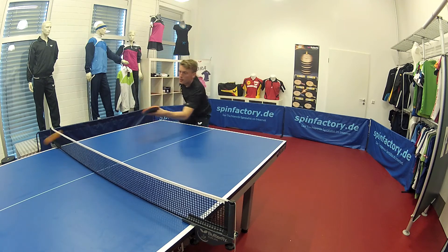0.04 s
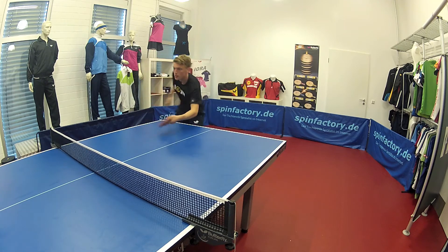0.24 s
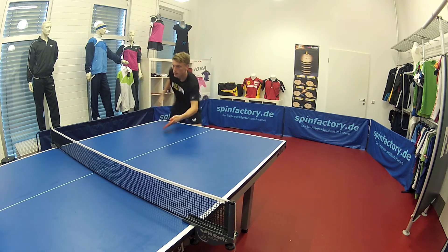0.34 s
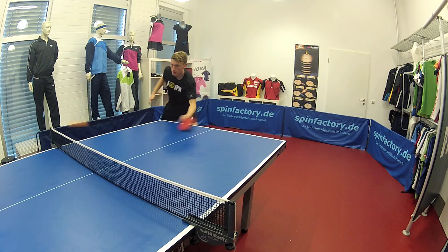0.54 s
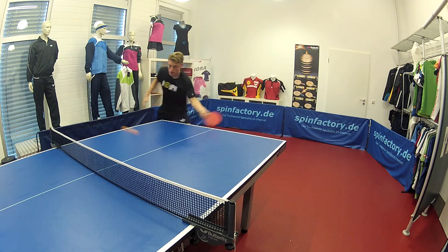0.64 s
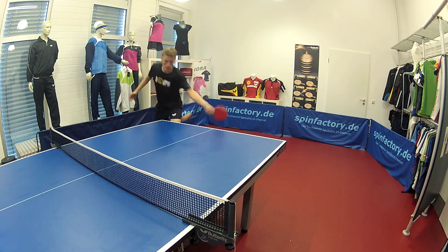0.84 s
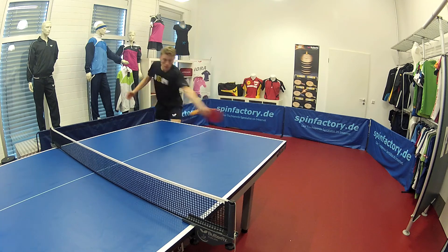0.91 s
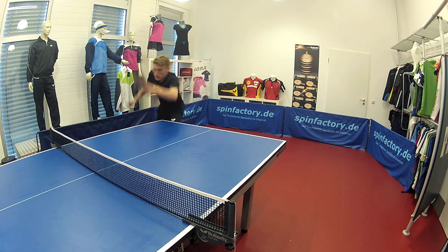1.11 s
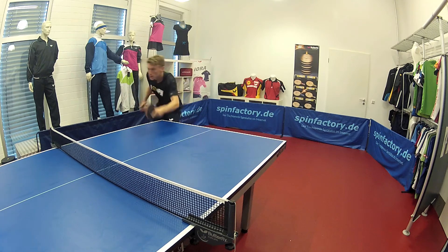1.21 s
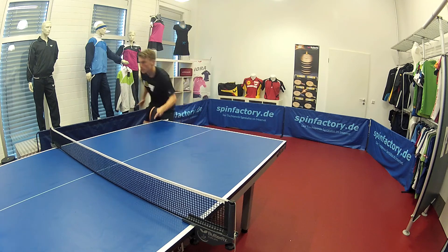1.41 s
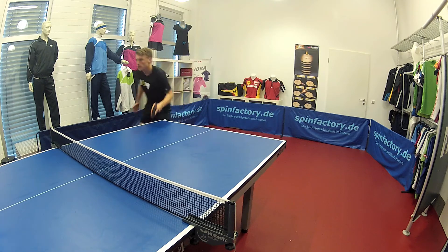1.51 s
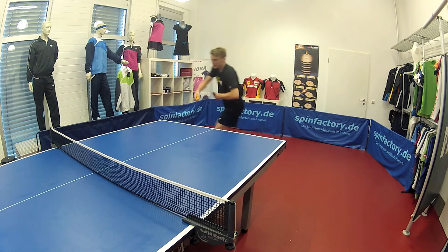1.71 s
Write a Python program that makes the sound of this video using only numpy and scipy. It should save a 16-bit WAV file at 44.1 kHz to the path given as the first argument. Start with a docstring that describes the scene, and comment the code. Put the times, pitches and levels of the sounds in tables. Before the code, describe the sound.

A table tennis ball tocks on the table at about 0.2 seconds. A rubber sole squeaks briefly around 0.5, and the ball bounces again at 0.8. A loud racket smash cracks just before 1.0, echoing through the small room, followed by a table bounce at 1.1 and a hard clack at 1.2. Faint taps come near 1.5, with soft footfalls and low room hiss underneath.

```python
"""A table tennis ball in a rally, heard from beside the net in a small, bright sports room.
It tocks on the ringing table top, cracks off a racket in a smash and clacks against something hard.
A rubber sole sticks and slips in a squeak; shoes scuff and thud faintly over the hiss of the room.
The two microphones are largely in opposite phase. Near the end the sound fades out
and the empty room fades back in."""
import sys
import numpy as np
from scipy import signal
from scipy.fft import rfft, irfft
from scipy.io import wavfile
from scipy.ndimage import uniform_filter1d

SR = 44100
rng = np.random.default_rng(int(sys.argv[2]) if len(sys.argv) > 2 else 0)


def dump(signal):
    """Clip the signal to [-1, 1] and save it as 16-bit WAV at the path in sys.argv[1]."""
    limited = np.clip(np.atleast_2d(signal).T, -1, 1)
    pcm = np.round(limited * 32767).astype(np.int16)
    wavfile.write(sys.argv[1], SR, pcm)


N = 77175

# Hits on the table: (time [s], level [dB], tilt [dB/octave], deep ring [dB], ball shell [dB],
# room send [dB], contact tick [dB])
BOUNCES = [(0.2367, 5.5, 0.5, -5, -10.5, 0.5, -30), (0.7713, 8.5, 0.5, 10, -13, -3, -36),
           (1.1164, 10, 1, -2, -29, -1.5, -43)]
# Ringing notes of the table top: (frequency [Hz], relative level [dB], t60 [s])
TABLE_MODES = [(250.6, -21.5, 0.54), (323, -26.5, 0.63), (490.6, -18.5, 0.47), (583, -20.5, 0.19),
               (735, -4, 0.086), (1125, -3, 0.13), (1277, -1.5, 0.032), (1485, -5, 0.055),
               (1640, -10.5, 0.08), (1917, -18.5, 0.037)]
# Woody body of its many weaker modes: (frequency [Hz], gain [dB])
PANEL_EQ = [(60, -45), (170, -21), (270, 4), (600, 4), (1000, 7), (1800, -0.5), (2250, -5), (2700, -18.5),
            (3400, -10.5), (4200, -25.5), (5200, -20), (7000, -23.5), (15000, -49)]
# Ping of the hollow ball: (frequency [Hz], relative level [dB], t60 [s])
SHELL_MODES = [(3400, -7, 0.0034), (4880, -2, 0.0078), (6860, -20, 0.0046), (8650, -3.5, 0.0081),
               (8520, -2, 0.0096), (9910, 3.5, 0.0086), (11660, -3.5, 0.0048), (11900, 1, .004),
               (13270, 1, .003)]
CONTACT_DB, TABLE_RING_DB, SHELL_DRY_DB = -6.5, -3, -30
DEEP_BELOW_HZ, MODES_ABOVE_HZ = 400, 170
TICK_HZ, TICK_WIDTH_S = 3360, 0.000506


def bounce(db, tilt_db, deep_db, shell_db, room_db, tick_db):
    """The struck table top gives a woody tock; the ball's shell pings into the room."""
    contact = ring(t60=0.17, rise=0.00084) + amp(CONTACT_DB) * click()
    tock = colour(contact, PANEL_EQ, tilt_db)
    strength = np.sqrt(np.sum(tock[0] ** 2))
    struck = [(hz, level + deep_db * (hz < DEEP_BELOW_HZ), t60) for hz, level, t60 in TABLE_MODES]
    ringing = signal.lfilter(*signal.butter(2, MODES_ABOVE_HZ, "high", fs=SR), modes(struck))
    top = tock + amp(TABLE_RING_DB) * strength * ringing
    shell = amp(shell_db) * strength * modes(SHELL_MODES)
    out = top + amp(SHELL_DRY_DB) * shell + room(amp(room_db) * top + shell)
    out[0] += wavelet(2 * TICK_WIDTH_S, tick_db, TICK_HZ, TICK_WIDTH_S)
    return amp(db) * out


# Tone of the racket's crack: (frequency [Hz], gain [dB])
SMASH_EQ = [(40, -57), (170, -22.5), (330, -14), (650, -3.5), (1030, 5), (1450, 0.5), (1950, 2), (2500, 0),
            (3150, 3), (4300, -0.5), (5400, 0.5), (6400, -4), (7100, -1.5), (7800, -10), (8400, -0.5),
            (8900, 3), (9600, -12), (12000, -15.5), (13600, -13), (15500, -52)]
# Ping of racket and ball: (frequency [Hz], relative level [dB], t60 [s])
PING_MODES = [(2848, -5.5, 0.013), (3130, 2, 0.014), (3327, -4.5, 0.022)]
SMASH_AT_S, WALL_DELAY_S = 0.9637, 0.009
SMASH_DB, PING_DB, SNAP_DB, EARLY_DB, WALL_DB = 14.5, -13, -22, -12, -13


def smash():
    """The racket's crack is weak on the direct path, returns hard from the walls and fills the room."""
    crack = colour(click(), SMASH_EQ) + amp(PING_DB) * modes(PING_MODES)
    snap = amp(SNAP_DB) * colour(ring(t60=0.035), SMASH_EQ, tilt_db=5)
    out = amp(EARLY_DB) * colour(ring(t60=0.29), SMASH_EQ)
    walls = amp(WALL_DB) * colour(ring(t60=0.16), SMASH_EQ, tilt_db=-1.5)
    add(out, WALL_DELAY_S, snap + walls + room(crack))
    return amp(SMASH_DB) * out


# Slapback of the smash: (time [s], level [dB], pitch [Hz], width [s])
SLAPS = [(0.97365, -11, 1830, 0.00035), (0.9847, -17, 2840, 0.0004)]


def slapback():
    """The first hard reflections of the smash arrive as tiny, sharp pulses."""
    return sum(wavelet(*row) for row in SLAPS)


# Ball against hard things: (time [s], level [dB], tilt [dB/octave], room send [dB])
CLACKS = [(0.2032, -16.5, -3.5, -15.5), (1.2115, -14, 0, 9.5), (1.2141, -0.5, -0.5, 2),
          (1.2186, -21.5, 11.5, -22)]
# Brittle tone of a clack: (frequency [Hz], gain [dB])
CLACK_EQ = [(40, -37), (150, -33), (400, -7.5), (1200, -3), (2600, -6), (4000, 5.5), (5200, 2), (6500, -10),
            (7800, -8.5), (9000, -9), (10300, -6), (13000, -20.5), (15500, -38)]
CLACK_RING_DB, ECHO_DB_PER_OCTAVE = 2, -2


def clack(db, tilt_db, room_db):
    """A short, hard contact of the ball; its echo is duller than the direct snap."""
    contact = click() + amp(CLACK_RING_DB) * ring(t60=0.018)
    echo = room(colour(contact, CLACK_EQ, tilt_db + ECHO_DB_PER_OCTAVE))
    return amp(db) * (colour(contact, CLACK_EQ, tilt_db) + amp(room_db) * echo)


# Faint, dull taps: (time [s], level [dB])
TAPS = [(0.2025, -17.5), (1.4745, -8.5), (1.489, -13), (1.5105, -8.5)]


def tap(db):
    """A light touch on wood that hardly rings."""
    touch = amp(db) * colour(ring(t60=0.045, rise=0.0011), PANEL_EQ, tilt_db=0.5)
    return touch + room(touch)


# Pitch and level curve of the squeak: (time [s], pitch [Hz], relative level [dB])
SQUEAK_CURVE = [(0.41, 2922, -61), (0.422, 2838, -32), (0.431, 2587, -25.5), (0.441, 2569, -15.5),
                (0.446, 2615, -35), (0.451, 2608, -12.5), (0.459, 2625, -18), (0.473, 2622, -34),
                (0.479, 2590, -22), (0.497, 2595, -31.5), (0.531, 2611, -21.5), (0.544, 2628, -35),
                (0.548, 2628, -24), (0.572, 2606, -33), (0.59, 2584, -22.5), (0.609, 2572, -33),
                (0.624, 2560, -58)]
# Its edge, the overtones that swell as the fundamental eases: (time [s], level [dB])
SQUEAK_EDGE = [(.415, -51), (.434, -36.5), (.468, -46), (.485, -36.5), (.53, -45.5), (.563, -37.5),
               (.59, -43.5), (.62, -54)]
# Mix of harmonics 2, 3 and 4: (level relative to the edge [dB])
SQUEAK_OVERTONES = [0, -17, -24]
SQUEAK_DB, SQUEAK_ROOM_DB, SQUEAK_LEFT_DB = 1, -7.5, -19.5
JITTER_DEPTH, JITTER_S = 0.0081, 0.002


def squeak():
    """A rubber sole sticks and slips on the floor at a nearly steady pitch."""
    t = np.arange(N) / SR
    times, hz, db = np.transpose(SQUEAK_CURVE)
    jitter = unit(uniform_filter1d(rng.standard_normal(N), int(JITTER_S * SR)))
    pitch = np.interp(t, times, hz) * (1 + JITTER_DEPTH * jitter)
    phase = 2 * np.pi * np.cumsum(pitch) / SR
    tone = amp(SQUEAK_DB + np.interp(t, times, db)) * np.sin(phase)
    edge_db = np.interp(t, *np.transpose(SQUEAK_EDGE))
    for harmonic, level in enumerate(SQUEAK_OVERTONES, start=2):
        tone += amp(edge_db + level) * np.sin(harmonic * phase)
    return (tone * (t > times[0]) * (t < times[-1]))[None]


# Shoe slides: (peak time [s], level [dB], attack [s], decay [s], tilt [dB/octave])
SCUFFS = [(0.046, -49.5, 0.0036, 0.006, -10.5), (0.449, -36.5, 0.039, 0.0071, 2.5),
          (0.58, -42.5, 0.0053, 0.0051, -2.5), (0.893, -36.5, 0.0013, 0.03, -1)]
# Tone of the friction: (frequency [Hz], gain [dB])
SCUFF_EQ = [(40, -46.5), (200, -18.5), (550, -1), (1200, 4), (2500, 3.5), (4000, -4), (7500, -6),
            (10000, -17), (15000, -36)]
GRAIN_SPREAD_DB, SCUFF_DRY_DB = 7.5, 3.5


def scuff(peak_s, db, rise, fall, tilt_db):
    """Grainy friction of a sliding sole swells, dies and echoes in the room."""
    t = np.arange(N) / SR - peak_s
    grains = rng.standard_normal((2, N)) * amp(-GRAIN_SPREAD_DB * rng.standard_normal(N))
    envelope = np.exp(-np.maximum(-t / rise, t / fall))
    slide = amp(db) * unit(colour(grains, SCUFF_EQ, tilt_db)) * envelope
    return amp(SCUFF_DRY_DB) * slide + room(slide)


# Soft footfalls: (time [s], level [dB], pitch [Hz], width [s])
STEPS = [(0.586, -54, 110, 0.012), (0.775, -46, 110, 0.005), (1.038, -48, 118, 0.015),
         (1.402, -50, 129, 0.024), (1.5, -47, 128, 0.029)]
STEPS_LEFT_DB = -5.5


def footsteps():
    """Feet push the sprung floor into brief, low thuds."""
    return sum(wavelet(*row) for row in STEPS)


# Reverb time of the room: (frequency [Hz], t60 [s])
ROOM_DECAY = [(100, 0.2), (300, 0.99), (1000, 1), (2000, 1), (4000, 1), (8000, 0.9), (14000, 0.15)]
ROOM_RISE_S = 0.006


def room(x):
    """Diffuse echo that builds up quickly and dies fastest in the deep bass and high treble."""
    hz, t, noise = signal.stft(rng.standard_normal((2, N)), SR, nperseg=256)
    rate = np.log(1000) / read(ROOM_DECAY, hz)[:, None]
    decaying = noise * np.exp(-rate * t) * np.sqrt(2 * rate / SR)  # equal energy in each band
    tail = signal.istft(decaying, SR, nperseg=256)[1][:, :N]
    tail *= 1 - np.exp(-np.arange(N) / SR / ROOM_RISE_S)
    return signal.fftconvolve(x[:1], tail, axes=1)[:, :N]


# Room tone: (frequency [Hz], relative level [dB])
AIR_EQ = [(25, 9), (60, 3), (100, 8), (170, 6.5), (500, 9), (1100, 8), (1800, 3), (2600, 2), (6000, -1.5),
          (10000, -5), (15000, -8)]
AIR_DB, TAIL_DB, TAIL_FALL_DB_PER_S = -55, -56.5, 82


def air():
    """Steady hiss of the room, with the dying echo of an earlier stroke."""
    hiss = amp(AIR_DB) * unit(colour(rng.standard_normal((2, N)), AIR_EQ))
    tail = unit(colour(rng.standard_normal((2, N)), SMASH_EQ, tilt_db=-4))
    return hiss + tail * amp(TAIL_DB - TAIL_FALL_DB_PER_S * np.arange(N) / SR)


# Stereo image of the rally: (frequency [Hz], left-right correlation [-1 to 1])
RALLY_IMAGE = [(50, 1), (95, -0.8), (150, -0.54), (400, -0.1), (1000, -0.58), (2700, -0.44), (6000, -0.49),
               (8500, -0.72), (10500, -0.82), (15000, -0.8)]
# Stereo image of the room tone: (frequency [Hz], left-right correlation [-1 to 1])
AIR_IMAGE = [(40, 1), (130, 0.62), (300, 0.32), (700, -0.19), (1400, -0.66), (3000, -0.053), (7000, -0.094),
             (15000, 0.5)]
# Lean to the right: (frequency [Hz], left minus right [dB])
BALANCE = [(60, -6), (140, -1), (220, -6), (330, -12), (500, -9.5), (800, -5), (1700, -1), (2700, -5),
           (6000, -2), (9500, -.5), (15000, 0.5)]


def microphones(x, image):
    """The left microphone shares part of the right one's sound, mostly inverted, plus a diffuse part."""
    hz = np.fft.rfftfreq(2 * N, 1 / SR)
    right, diffuse = rfft(x, 2 * N)
    shared = np.clip(read(image, hz), -1, 1)
    left = amp(read(BALANCE, hz)) * (shared * right + np.sqrt(1 - shared ** 2) * diffuse)
    return irfft(np.array([left, right]))[:, :N]


def click():
    """A direct impulse. Row 0 reaches both microphones; row 1 is for diffuse sound on the left alone."""
    x = np.zeros((2, N))
    x[0, 0] = 1
    return x


def ring(t60, rise=1e-5):
    """A dense crowd of modes falling together by 60 dB in t60 seconds, energy 1."""
    t = np.arange(N) / SR
    decaying = rng.standard_normal((2, N)) * 1e-3 ** (t / t60)
    return unit(decaying * (1 - np.exp(-t / rise))) / np.sqrt(N)


def modes(table):
    """Single modes as decaying sines of random phase, energy 1."""
    t = np.arange(N) / SR
    x = sum(amp(db) * 1e-3 ** (t / t60) * np.sin(2 * np.pi * (hz * t + rng.random((2, 1))))
            for hz, db, t60 in table)
    return unit(x) / np.sqrt(N)


def wavelet(centre_s, db, hz, width_s):
    """A few cycles under a bell-shaped envelope."""
    t = np.arange(N) / SR - centre_s
    return amp(db) * np.exp(-(t / width_s) ** 2 / 2) * np.sin(2 * np.pi * hz * t)


def colour(x, eq, tilt_db=0):
    """Minimum-phase EQ, tilted in dB per octave about 2 kHz."""
    hz = abs(np.fft.fftfreq(4096, 1 / SR))
    octaves = np.log2(np.maximum(hz, 200) / 2000)
    log_gain = np.log(amp(read(eq, hz) + tilt_db * octaves))
    impulse = np.fft.ifft(np.exp(np.conj(signal.hilbert(log_gain)))).real[:2048]
    return signal.fftconvolve(x, impulse[None], axes=1)[:, :N]


def amp(db):
    """Decibels to gain."""
    return 10 ** (np.asarray(db) / 20)


def unit(x):
    """Scales to rms 1."""
    return x / np.sqrt(np.mean(x ** 2) + 1e-20)


def read(points, hz):
    """Reads a table on a log-frequency axis."""
    f, value = np.transpose(points)
    return np.interp(np.log(hz + 1), np.log(f), value)


def add(mix, s, sound):
    """Mixes a sound in at time s."""
    part = mix[:, max(round(s * SR), 0):]
    part += sound[:, :part.shape[1]]


DIP_S, FADE_OUT_S, FADE_IN_S, LOWPASS_HZ = 1.607, 0.115, 0.06, 15300


def scene():
    """The rally, which ends at the dip, over the room tone."""
    rally = sum(scuff(*row) for row in SCUFFS)
    for s, *row in BOUNCES:
        add(rally, s, bounce(*row))
    for s, *row in CLACKS:
        add(rally, s, clack(*row))
    for s, db in TAPS:
        add(rally, s, tap(db))
    add(rally, SMASH_AT_S, smash())
    sole = squeak()
    rally += amp(SQUEAK_ROOM_DB) * room(sole)
    rally *= np.arange(N) / SR < DIP_S
    direct = sole * np.array([[-amp(SQUEAK_LEFT_DB)], [1]])  # weaker and inverted on the left
    direct += footsteps() * np.array([[-amp(STEPS_LEFT_DB)], [1]])
    direct[1] += slapback()  # right only
    return microphones(rally, RALLY_IMAGE) + microphones(air(), AIR_IMAGE) + direct


def record(dry):
    """The level fades to silence and back; a steep low-pass trims the top."""
    t = np.arange(N) / SR - DIP_S
    fade = np.minimum(np.maximum(-t / FADE_OUT_S, t / FADE_IN_S), 1)
    lowpass = signal.firwin(511, LOWPASS_HZ, window=("kaiser", 9), fs=SR)
    return signal.oaconvolve(dry * fade, lowpass[None], "same")


dry = scene()
out = record(dry)
dump(out)
```